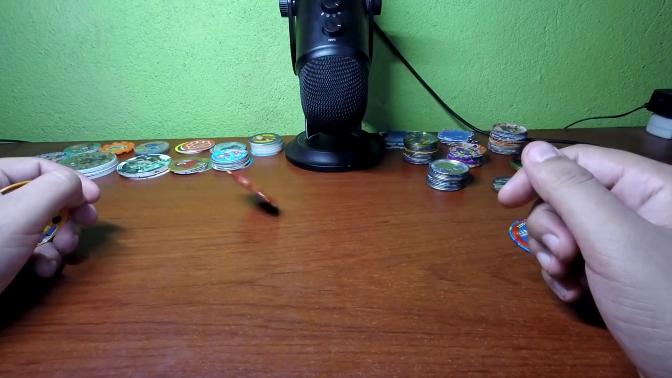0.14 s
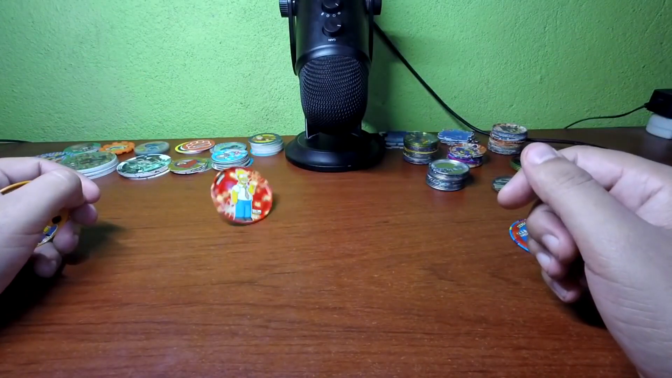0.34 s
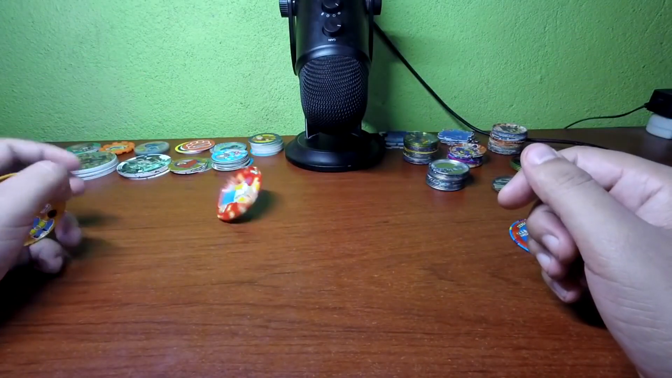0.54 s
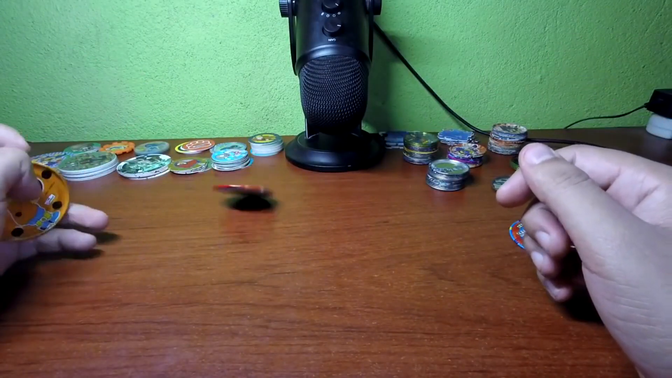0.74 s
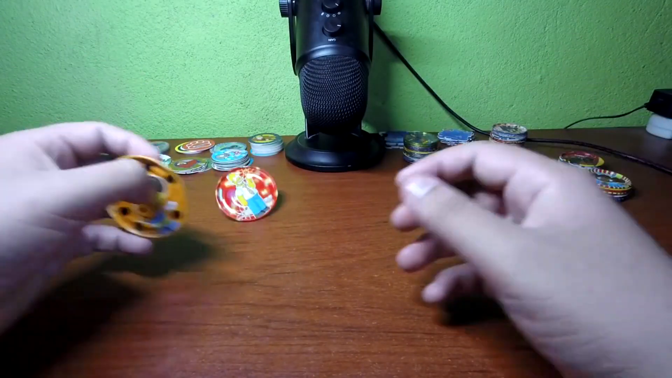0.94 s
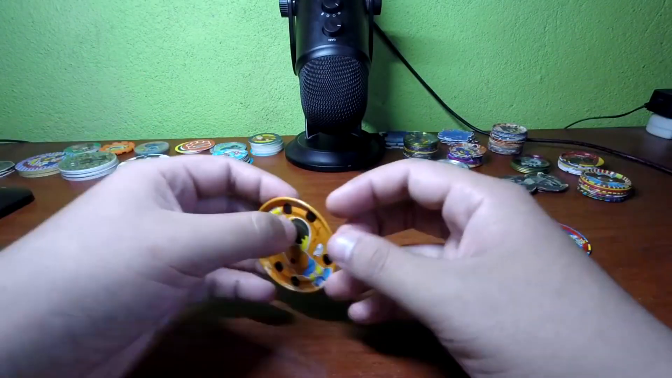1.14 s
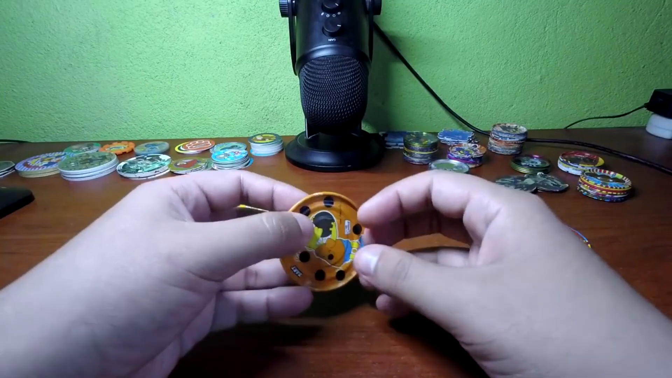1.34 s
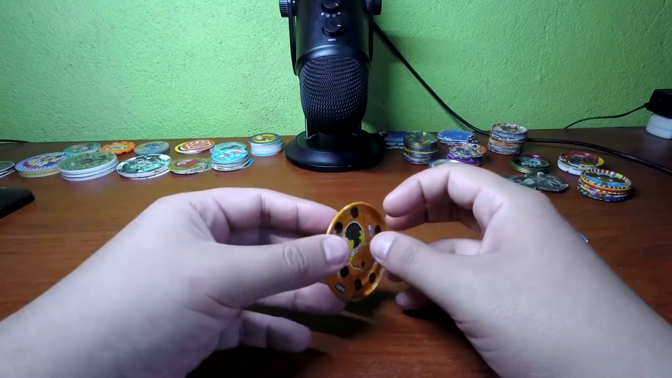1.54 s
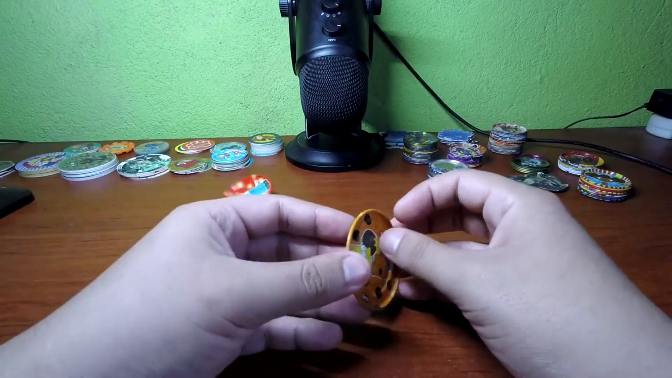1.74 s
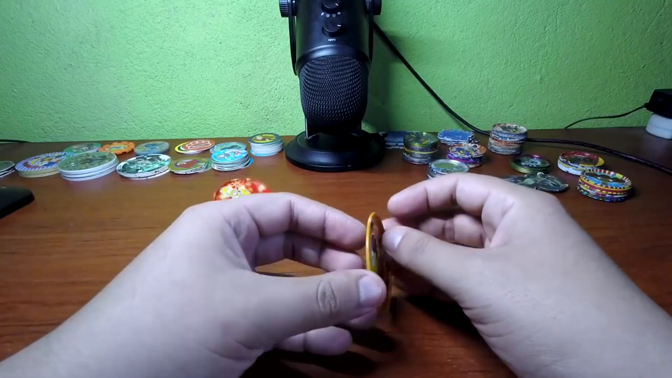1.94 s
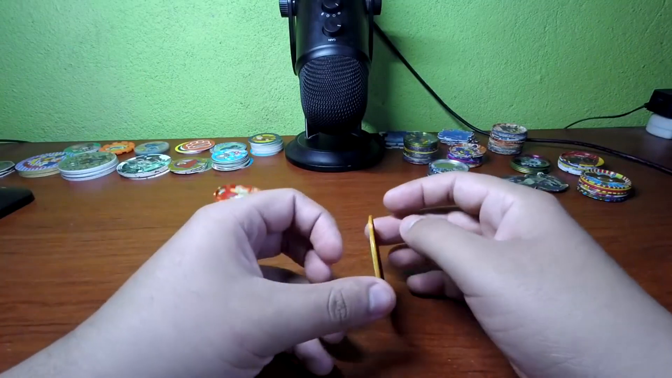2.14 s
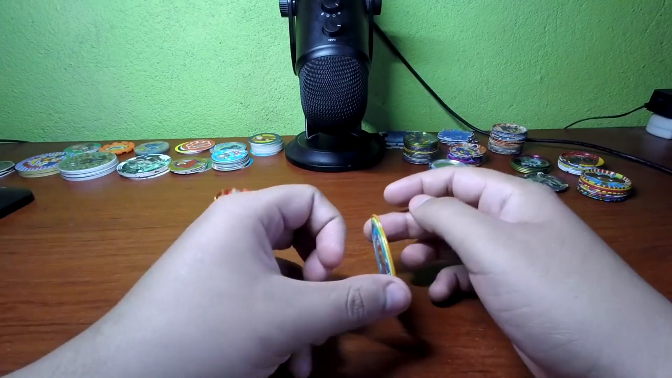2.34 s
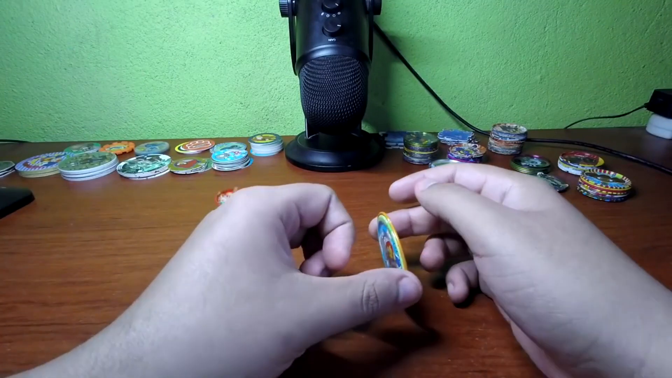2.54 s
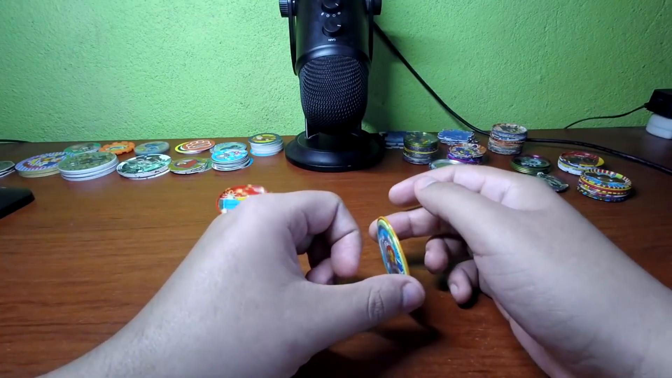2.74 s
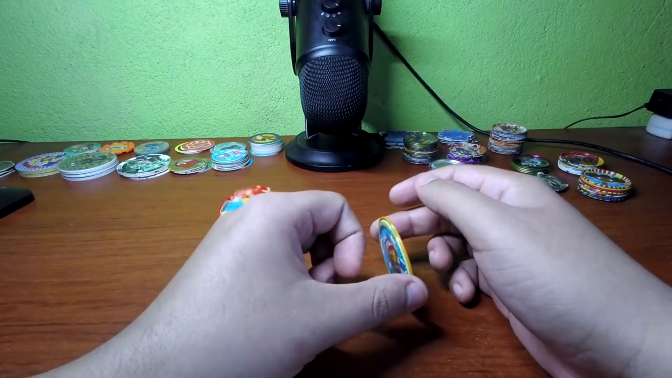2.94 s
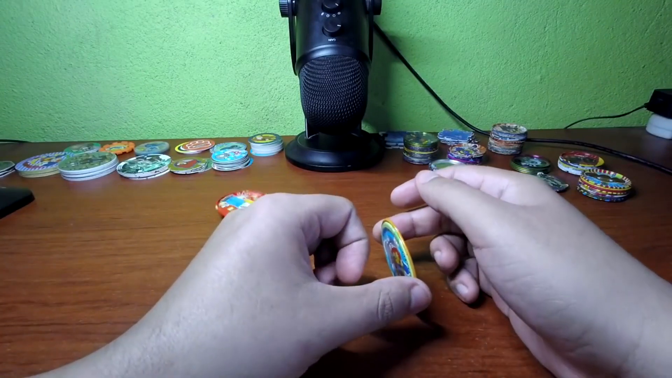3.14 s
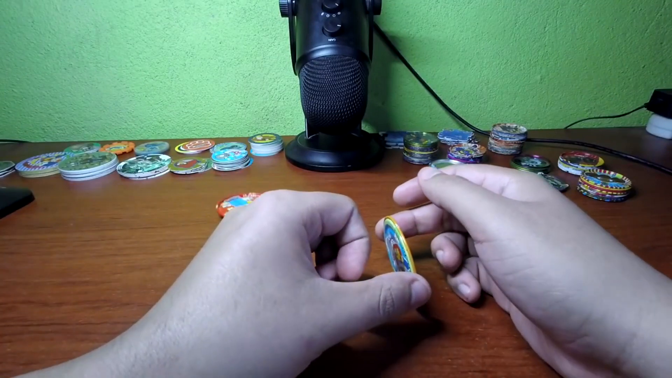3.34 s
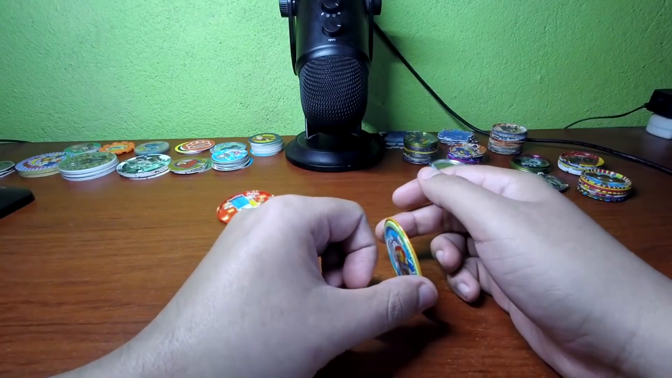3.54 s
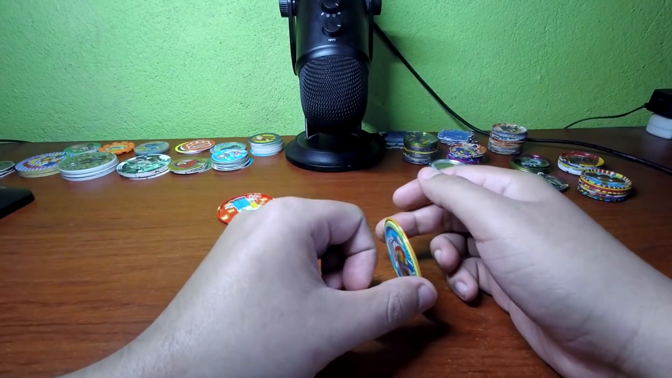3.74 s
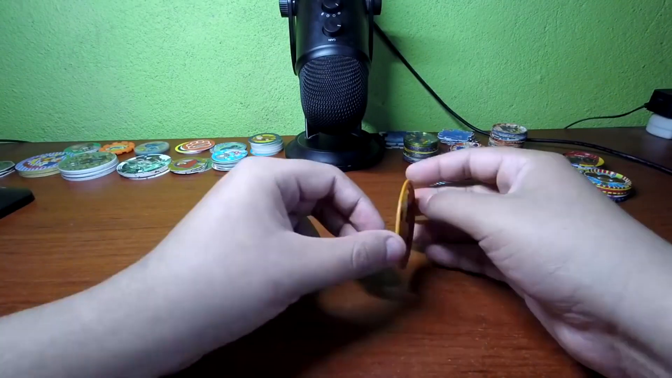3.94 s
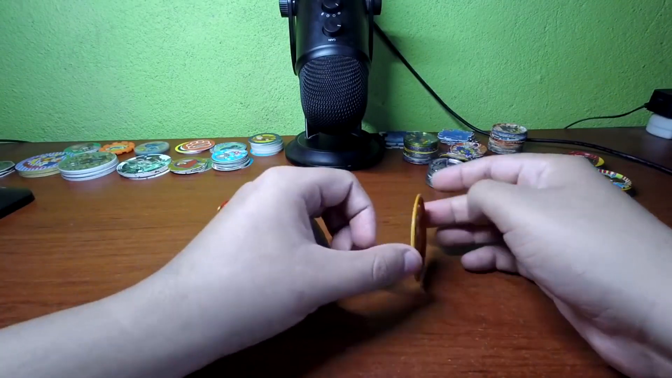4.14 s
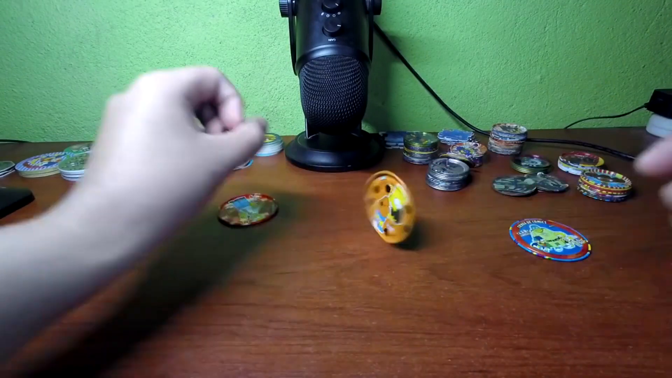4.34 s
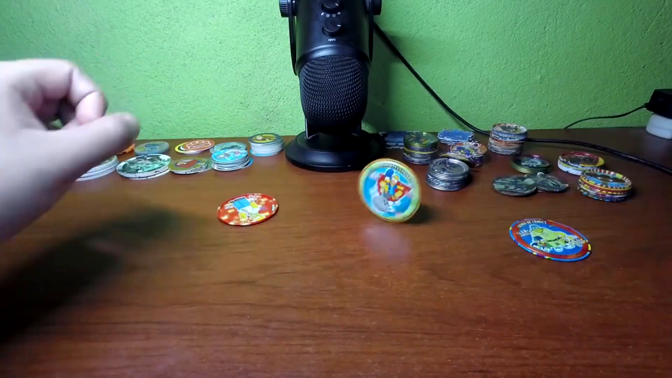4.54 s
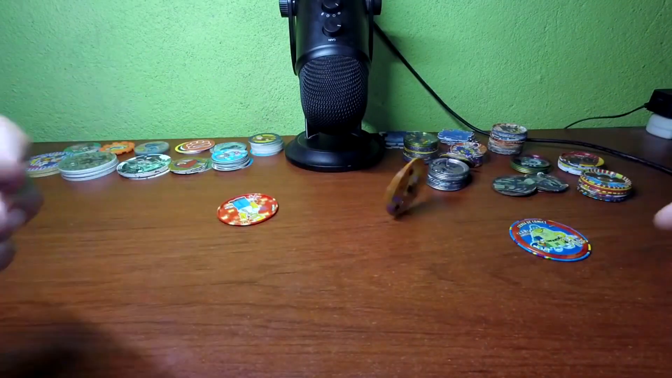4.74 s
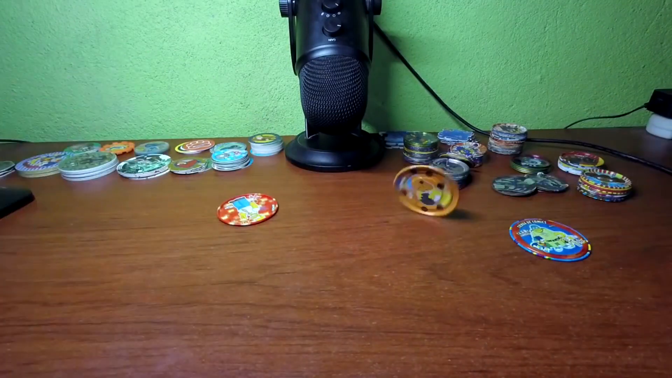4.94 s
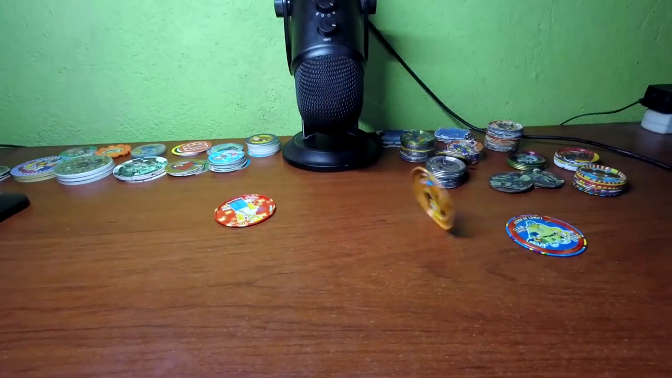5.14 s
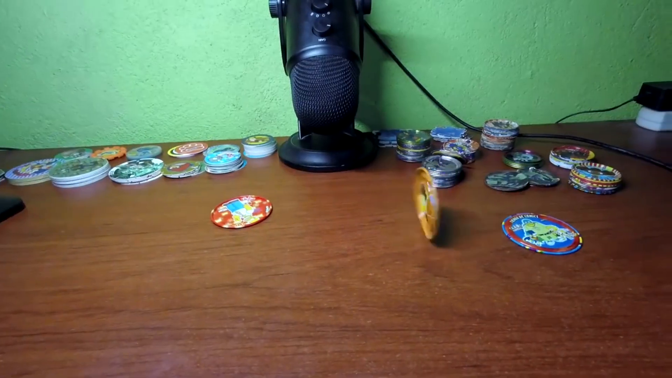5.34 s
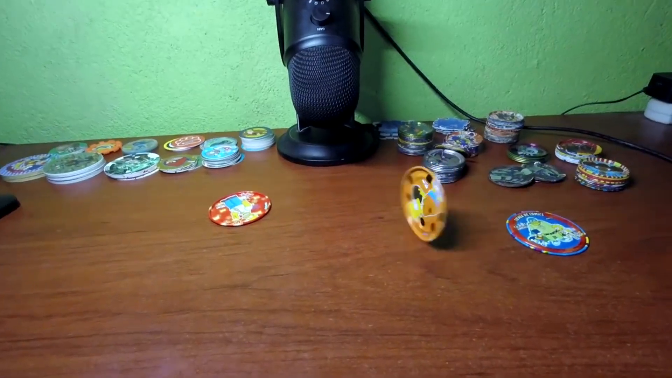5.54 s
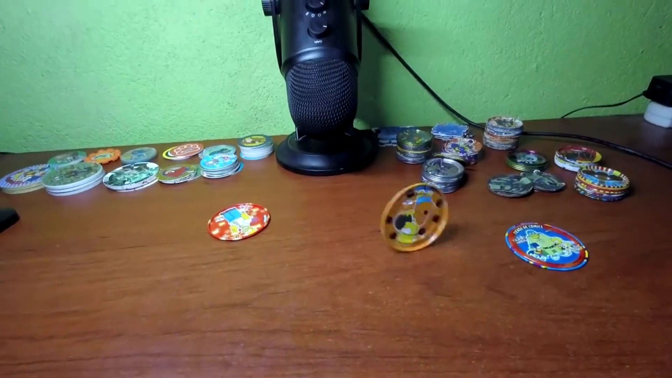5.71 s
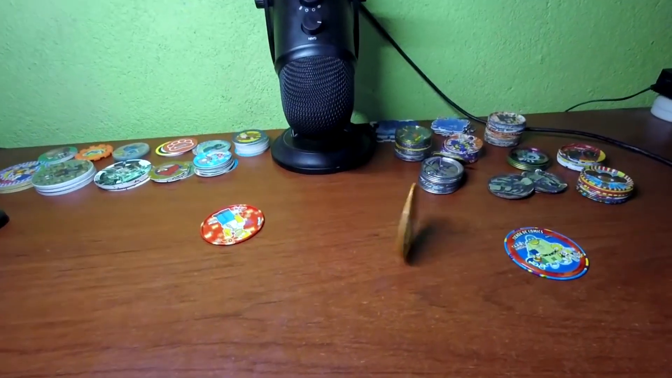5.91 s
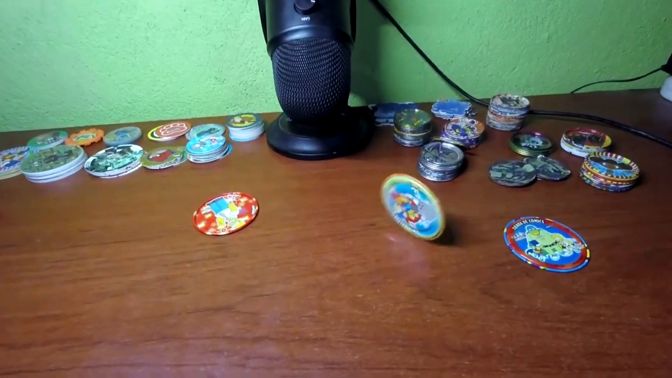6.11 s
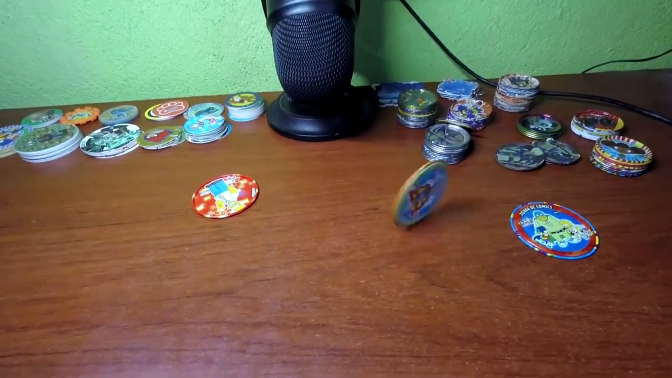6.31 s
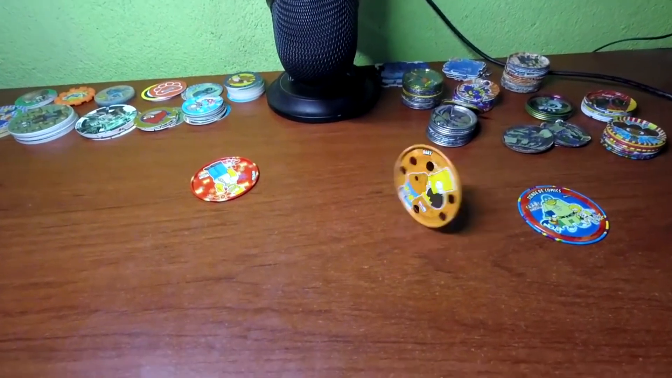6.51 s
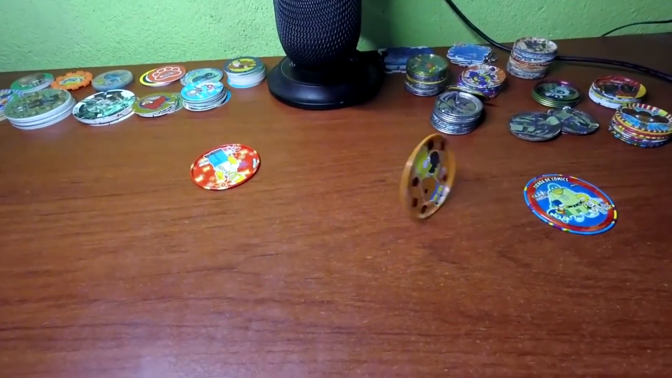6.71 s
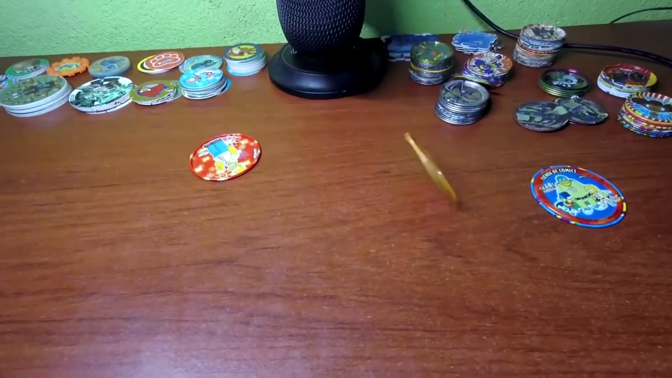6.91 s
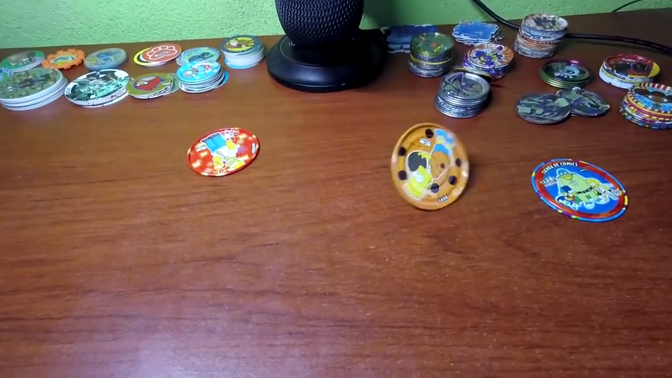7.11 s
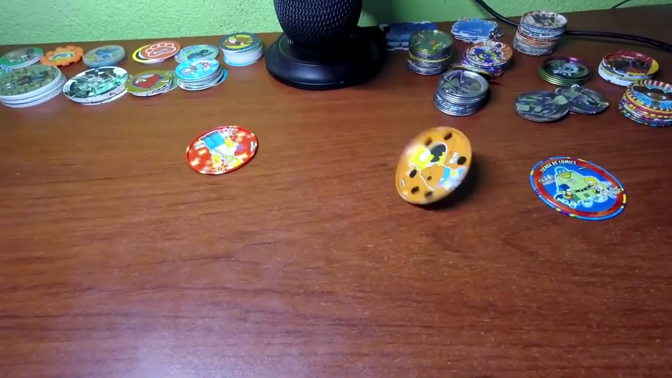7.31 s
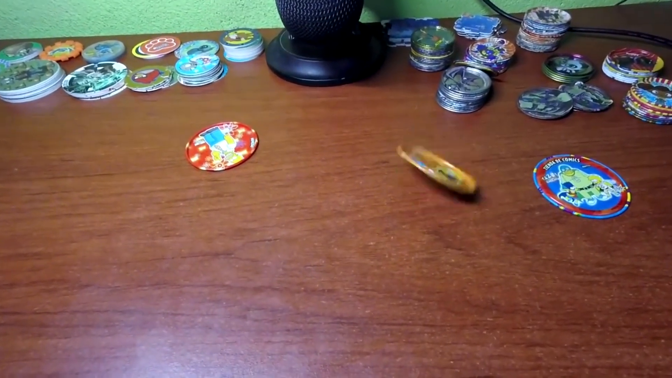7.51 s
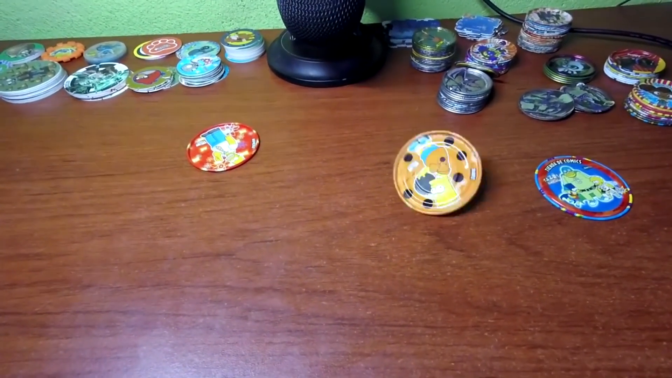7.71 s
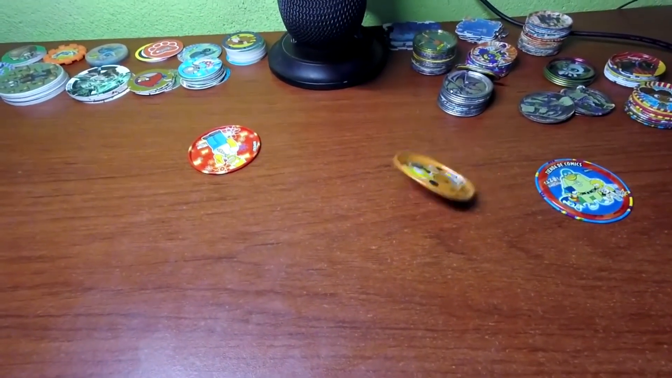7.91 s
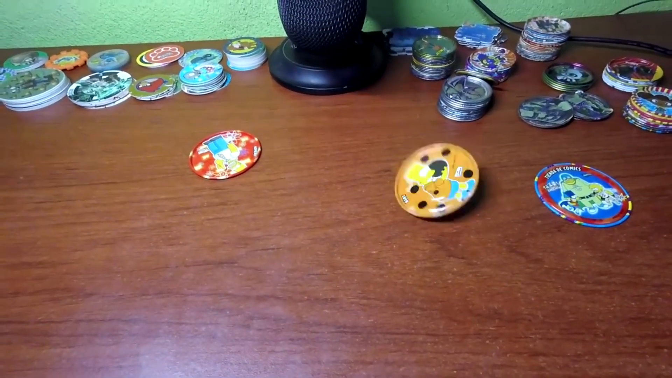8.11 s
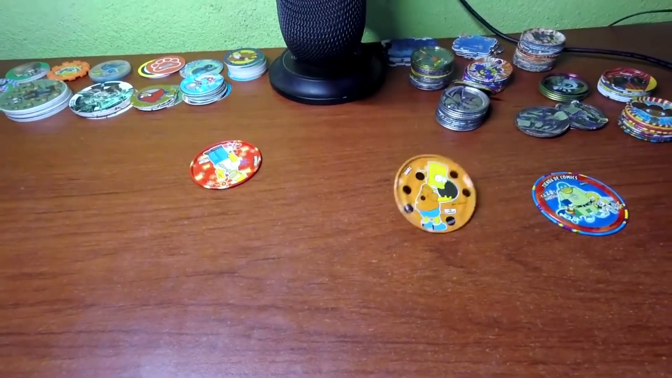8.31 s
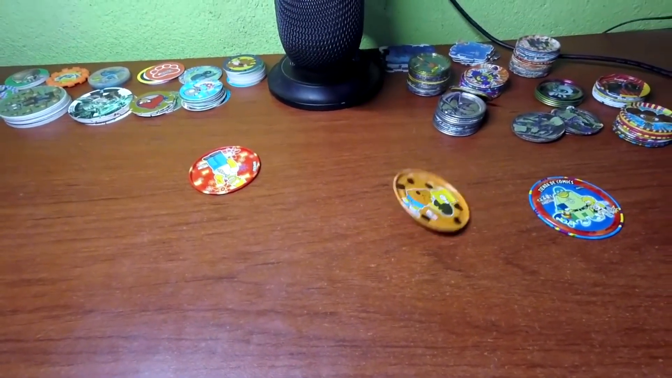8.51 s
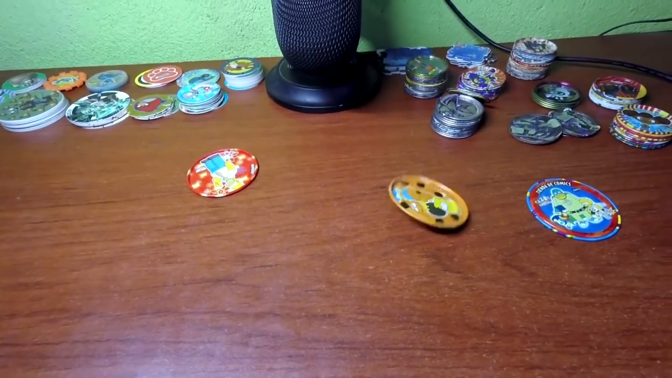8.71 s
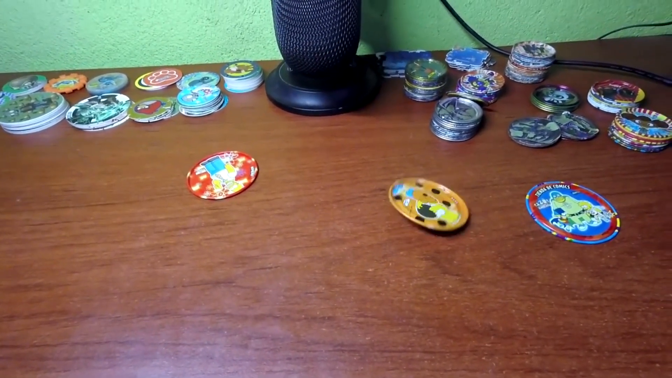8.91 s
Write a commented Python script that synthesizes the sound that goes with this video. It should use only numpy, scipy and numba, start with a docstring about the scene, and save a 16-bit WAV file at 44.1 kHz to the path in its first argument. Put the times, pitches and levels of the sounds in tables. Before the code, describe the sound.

A close stereo microphone in a quiet room, with faint room noise and a low, soft shaking of the table throughout. From the start a thin metal disc rolls on its rim on wood: a dense, grainy, bright metallic rattle, pulsing about five times a second, quickening and growing brighter, strongest around 2.4, then racing at over twenty wobbles a second before being damped flat at about 3.8. A short near-silence follows. At 4.2 a second disc lands with a clear, ringing clack and spins on edge, fading to faint ringing skids and light taps, with dull thumps at 4.7 and 5.0 and a tiny cloth rustle just after. From 5.6 to 6.4 it is almost silent. Around 6.8 it leans over and the bright rattle returns, with sharper knocks at 7.8, 8.6 and 8.7, wobbling from six to eleven times a second and still running when the sound ends at about 9.

```python
"""Over quiet room noise and a low shaking, a thin metal disc rolls on its rim on a wooden table:
dense contact ticks excite its modes and swell as it wobbles ever faster, until it lies flat and is damped.
A second disc then lands and spins on edge, ringing longer, with skids, thumps and brief cloth rustles;
at last it leans over and wobbles ever faster in its turn. Modes are driven resonators; wood, scrape,
cloth, thumps and room are filtered noise or ticks."""
import sys
import numpy as np
from scipy import signal
from scipy.fft import rfft, irfft
from scipy.io import wavfile
from scipy.ndimage import uniform_filter1d
from numba import njit

SR = 44100
rng = np.random.default_rng(int(sys.argv[2]) if len(sys.argv) > 2 else 0)


def wav_out(sig):
    """Save sig, one row per channel (or a flat mono array), as 16-bit PCM at SR to the path in sys.argv[1]."""
    wavfile.write(sys.argv[1], SR, np.round(np.clip(np.atleast_2d(sig).T, -1, 1) * 32767).astype(np.int16))


N = 399546
HOP = 16  # samples per step of the slow controls

# Room noise spectrum: f/Hz, relative density/dB
ROOM_SPECTRUM = [(110, -5.5), (150, -11), (210, -6), (250, 4), (290, -10.5), (400, -10), (560, -20),
                 (650, -8.5), (800, -19), (1900, -31), (4000, -39.5), (15600, -47)]
ROOM_DB = -56.5  # mean level of a slow random sway
# Spectrum of the low shaking: f/Hz, relative density/dB
SHAKE_SPECTRUM = [(15, -14), (30, -7), (41, 3), (52, -1), (63, 1), (80, -6), (105, -12.5), (135, -27),
                  (250, -56)]
# Steady low shaking of the stand: t/s, level/dB
SHAKING_LEVEL = [(0.0, -44), (0.2, -48), (1.3, -46.5), (1.85, -44), (2.25, -49.5), (3.5, -52.5), (3.8, -47),
                 (5.5, -49), (9.06, -49.5)]
# Thumps through the table: t/s, length/s, left level/dB, right level/dB
THUMPS = [(0.72, .2, -48, -49), (2.72, 0.1, -45, -48), (4.17, 0.23, -43, -42), (4.74, 0.18, -39, -43),
          (5.02, 0.21, -31, -35.5)]
SWELL_RISE = .3  # share of a swell's length spent rising

# Rolling rim of each disc: t/s, low ring level/dB, high ring level/dB
FIRST_ROLL = [(0.0, -41.5, -38), (0.48, -40.5, -35), (0.54, -38.5, -29.5), (1.08, -38.5, -29.5),
              (1.15, -41, -30.5), (1.55, -39, -28), (2.1, -41.5, -26), (2.38, -38.5, -21),
              (2.45, -39.5, -28), (3.3, -40, -28.5), (3.6, -42.5, -32.5), (3.73, -43, -39.5),
              (3.81, -80, -82)]
SECOND_ROLL = [(4.192, -36, -53), (4.22, -32, -44), (4.3, -32, -48), (4.36, -43.5, -57.5),
               (4.48, -46.5, -66), (4.64, -47.5, -64), (4.69, -72, -82.5), (5.19, -55.5, -73.5),
               (5.6, -73.5, -96), (6.3, -77.5, -99), (6.45, -65.5, -77), (6.66, -52.5, -75.5),
               (6.84, -43.5, -49.5), (6.91, -40.5, -36), (7.3, -40, -32), (7.75, -41.5, -31),
               (7.85, -39.5, -27.5), (8.8, -43, -27), (8.89, -42.5, -35.5), (9.06, -39, -28)]
# Wobble, faster as the disc sinks: t/s, rate/(turns per s)
FIRST_WOBBLE_RATE = [(0, 5.407), (.8, 7.042), (1.6, 8.165), (2.4, 9.902), (3.1, 12.719), (3.45, 17.344),
                     (3.7, 22.271)]
SECOND_WOBBLE_RATE = [(6.85, 6.41), (7.4, 6.719), (8, 8.178), (8.5, 9.01), (9.05, 10.833)]
FIRST_TURN, SECOND_TURN = .184, 0.51  # part of a turn left to the first swell
# Mode pitches: f/Hz
FIRST_PITCHES = [1575, 2444, 2869, 3580, 3706, 3908, 5238, 6110, 7142, 7252, 7481, 8021, 9204, 9330, 9826,
                 11469, 11596, 12065, 13340, 13722, 14806, 14911, 15003]
SECOND_PITCHES = [1735, 2450, 2642, 3425, 3860, 4325, 5457, 7216, 7619, 7725, 7855, 8267, 9440, 10911,
                  11153, 11854, 11962, 12245, 14249, 15095]
# One row per pitch: width/Hz before damping (at least 5), relative level/dB,
# left minus right level/dB, phase lag of the right channel/rad
FIRST_MODE_ROWS = [(57, -9.5, 2.5, 0.83), (58.4, -14, -5, 0.07), (90, -27, -1, -1.5), (71, -13, -10.5, 0),
                   (41, -2, 0.5, 4.5), (33, -10, 6, 0), (25, 0, 14, 1.44), (24, -10, 11.5, -1.5),
                   (25.7, -2.5, 3.5, 3.1), (19.5, 2, 2, 2.35), (19, 4, 6.5, 1.4), (90, -4.5, 9.5, 2.5),
                   (23, -1.5, 1.6, 3.5), (35, -2, 1.5, 3.5), (33.7, -0.2, 5.5, 3.5), (26.14, -10, 8.5, 2),
                   (30, -14, 4.5, 0.1), (63, -5.5, 8, -1.5), (19, -5.5, 11.5, -2.2), (41, -22.5, 8.5, 4.5),
                   (26.22, -7.5, 10.5, -1.5), (34, -4, 10, -1), (90, -11, 10, -2.2)]
SECOND_MODE_ROWS = [(53.5, -7, -5, 1.33), (96, -28, -18, 0.8), (39, -10.5, -7.5, 0.85),
                    (75.6, -17.5, -7, 0.96), (32.5, 1, 1.1, 3), (47, -17, -9, -2.5), (30, -0.5, 0, -1.2),
                    (26, -3, -8.5, -1.5), (22, -7, -6, 2.5), (22.222, -3, -9, 3.5), (12.4, -2.5, -8.5, 4),
                    (31.8, -4, -2, 1.5), (23, -8.5, 8.5, 1), (17, -7.5, -3, 3), (25.926, -4.5, -4, 4),
                    (18, -16, 8, 9), (28, -23, -3, 9.5), (23, -19, 11, -2), (35.8, -4, -7, 1.5),
                    (38, -17, 2, -1.5)]
# Landings of the rim on the wood: t/s, low ring level/dB, high ring level/dB, before the pulse shape
LANDINGS = [(4.1922, -17.5, -38), (4.2185, -26, -32), (4.2405, -26, -48), (4.2584, -32, -38),
            (4.577, -31, -45), (4.7214, -43, -76), (4.763, -36, -72), (4.8954, -46, -80),
            (4.9462, -38, -66), (5.1347, -38, -64), (5.469, -53, -80), (5.7004, -50, -81),
            (6.4044, -47, -43.5), (6.5154, -47, -71), (7.813, -31, -18), (8.614, -43, -18.5),
            (8.705, -63, -18.5)]
# Skids or heavier pressure of the rim: t/s, length/s, low ring level/dB, high ring level/dB
SKID_SWELLS = [(0.0, 0.084, -37, -43), (0.147, 0.11, -43.5, -30.5), (0.331, 0.034, -64, -45),
               (0.706, .086, -65, -34), (0.986, 0.033, -65, -30), (1.041, 0.066, -52, -30.5),
               (1.253, .04, -38.5, -33), (1.327, 0.048, -60, -34.5), (1.569, 0.1, -52, -26),
               (1.907, 0.073, -40, -28), (2.038, 0.1, -51, -25), (2.463, 0.06, -50, -21.5),
               (2.556, 0.063, -39, -23), (2.914, 0.066, -47, -28), (2.999, 0.022, -54, -26),
               (3.07, 0.074, -45, -32), (3.343, 0.061, -47, -30), (3.41, .045, -56, -33),
               (3.468, .03, -62, -24), (4.52, 0.13, -41.5, -62), (4.71, 0.066, -49, -85),
               (4.755, 0.087, -47.5, -98), (4.885, 0.13, -48, -84), (4.93, 0.078, -45.5, -68),
               (5.11, .11, -44, -61), (5.46, 0.078, -62, -90), (5.69, .11, -58.5, -90),
               (6.02, 0.11, -62, -94.5), (6.35, 0.16, -46.5, -69.5), (6.51, 0.038, -62, -82),
               (7.074, .053, -43.5, -57), (7.221, 0.088, -44.5, -36), (7.37, 0.18, -55, -36.5),
               (7.805, .07, -48, -34), (7.914, 0.067, -41, -39), (8.023, 0.063, -58, -56),
               (8.139, 0.047, -50, -29), (8.49, 0.051, -44, -24), (8.604, 0.02, -51, -34),
               (8.698, 0.035, -71, -32), (8.755, 0.064, -47, -32.5), (8.984, 0.081, -58, -35)]
# Table-top response to the ticks: f/Hz, relative density/dB
WOOD_SPECTRUM = [(150, -16.5), (230, -6), (400, -10), (720, -14.5), (950, -8), (1400, -2.5), (2000, -7),
                 (3000, -6), (4400, -20), (9000, -29.5)]
# Scrape of the rim: f/Hz, relative density/dB
SCRAPE_SPECTRUM = [(2500, -30.5), (4400, -6), (6500, -5.5), (8600, 4), (10000, -11.5), (10500, -16.5),
                   (11300, -19), (12800, -10), (15500, -3.5)]
# Change of mode level when fully on edge: f/Hz, level/dB
EDGE_RING_LEVEL = [(1735, -3.5), (2450, 0.5), (2642, 5), (3425, -3), (3860, -5.5), (4325, -4), (5457, -1),
                   (8000, -2.5), (9400, 0), (15000, 6)]
# Duller wood response under a disc on edge: f/Hz, relative density/dB
EDGE_WOOD_SPECTRUM = [(150, -5.5), (300, -6), (650, -3), (1300, 1.5), (2000, -5.5), (3500, -27.5),
                      (6000, -31.5)]
WOOD_DB, EDGE_WOOD_DB, SCRAPE_DB = -5, -5.5, -11.5  # wood relative to low ring, scrape to high ring
TICKS_PER_S, TICK_SPREAD_DB = 6000, 2.2  # mean rate of each train, mean of the exponential size spread
# Swell of the rings once and twice a turn, and spread of their random drift (dB)
LOW_ONCE_DB, LOW_TWICE_DB, HIGH_ONCE_DB, HIGH_TWICE_DB, DRIFT_DB = 1.75, 2, 1.33, 0, -0.4
# Half-turn knocks: level over the rolling before the pulse shape, and scatter (dB)
KNOCK_LOW_DB, KNOCK_HIGH_DB, KNOCK_SCATTER_DB = -1, 0.5, 6
ROLL_IN_S, LAND_S = (0.0083, 0.0073), (0.00016, 0.0033)  # rise and decay time constants (s)
# On edge, below this low ring level a contact hardly rings the disc: extra dB lost per dB
FAINT_DB, FAINT_SLOPE = -48.5, 2
# Spin on edge: rate (turns per s), a moment facing the microphone (s), depth 0-1 when fully upright
SPIN_PER_S, FACING_S, FACING_DEPTH = 6.9, 4.58, 0.56
# Random drift of the drive (dB), and of aim (dB) and phase (rad) where the beam is narrowest
TRAVEL_DB, AIM_DB, PHASE_RAD = 2.0, 2.0, 0.99
TWIN_SHARE = 0.3  # power share of the twin mode in the right channel, where the beam is narrowest

# Cloth rustles: t/s, length/s, level/dB
RUSTLES = [(4.74, .2, -62), (5.045, .035, -42.5), (5.13, .08, -74), (5.24, 0.027, -52), (5.385, 0.022, -64),
           (5.405, .04, -61)]
# Cloth spectrum: f/Hz, relative density/dB
CLOTH_SPECTRUM = [(1180, -4), (2000, -7), (2570, -11), (2750, -15), (3650, -12), (8190, -12), (15600, -15)]
TOP_HZ = 15620  # upper band limit


def undb(db):
    """Logarithmic level: decibels to amplitude gain."""
    return 10 ** (np.asarray(db) / 20)


def unit(x):
    """Normalisation to an rms amplitude of 1."""
    return x / np.sqrt(np.mean(x ** 2))


def curve(table, t):
    """Linear interpolation of each column at times t; -120 outside the table's span."""
    s, *columns = np.transpose(table)
    return [np.interp(t, s, c, left=-120, right=-120) for c in columns]


def colour(x, spectrum):
    """Minimum-phase filtering: folding the cepstrum of the log gain gives a causal response."""
    hz, db = np.transpose(spectrum)
    size = 8192
    bins_hz = np.arange(size // 2 + 1) * SR / size
    log_gain = np.interp(np.log(bins_hz + 1), np.log(hz), db) * np.log(10) / 20
    cepstrum = irfft(log_gain)
    cepstrum[1:size // 2] *= 2
    cepstrum[size // 2 + 1:] = 0
    response = irfft(np.exp(rfft(cepstrum)))
    return signal.oaconvolve(x, response / np.linalg.norm(response))[:len(x)]


def high_pass(x, hz):
    """Fourth-order Butterworth attenuation of the bass."""
    return signal.sosfilt(signal.butter(4, hz, "high", fs=SR, output="sos"), x)


def walk(rate, t):
    """Random modulation: normal levels drawn rate times a second, joined linearly; spread near 1."""
    levels = rng.standard_normal(N // 400)
    return np.interp(t * rate, np.arange(len(levels)), levels) * 1.2


def wide(spectrum, side):
    """Partial stereo coherence: one shared noise plus one of opposite sign in the two channels."""
    m, s = (colour(rng.standard_normal(N), spectrum) for _ in range(2))
    return unit(np.array([m + side * s, m - side * s]))


def swells(table, t):
    """Sine-squared envelopes: every row rises and dies away over its length, and rows add."""
    out = np.zeros((len(table[0]) - 2, len(t)))
    for s, length, *dbs in table:
        near = slice(*np.searchsorted(t, [s, s + length]))
        phase = np.interp(t[near] - s, [0, SWELL_RISE * length, length], [0, np.pi / 2, np.pi])
        out[:, near] += np.outer(undb(dbs), np.sin(phase) ** 2)
    return out


def room(t):
    """Stationary room noise: a filtered spectrum, strongest near 250 Hz, swaying slowly in level."""
    return unit(high_pass(wide(ROOM_SPECTRUM, .6), 95)) * undb(ROOM_DB + 0.87 * walk(1.7, t))


def thump(t):
    """Low-frequency vibration of the stand: steady shaking with short swells for the thumps."""
    balance_db = np.array([[.8], [-.8]])
    shaking = undb(curve(SHAKING_LEVEL, t)[0] + 1.6 * walk(6.6, t) + balance_db)
    return wide(SHAKE_SPECTRUM, 0.65) * (shaking + swells(THUMPS, t))


def ticks(t):
    """Random impulsive contact: two trains of dense ticks of either sign, bunched as the grain passes."""
    hit = rng.random((2, len(t))) < TICKS_PER_S / SR
    size = undb(TICK_SPREAD_DB * rng.exponential(size=hit.shape) + 1.1 * walk(45, t))
    sign = np.sign(rng.random(hit.shape) - .5)
    return unit(hit * size * sign)


def knocks(table, t, rise_s, decay_s):
    """Transient contact force: each knock presses the rim into the grain with a rise and a decay."""
    out = np.zeros((2, len(t)))
    for s, *dbs in table:
        near = slice(*np.searchsorted(t, [s, s + .06]))
        age = t[near] - s
        out[:, near] += np.outer(undb(dbs), (1 - np.exp(-age / rise_s)) * np.exp(-age / decay_s))
    return out


def contact(roll, wobble, first_turn, t):
    """Periodic contact force: rolling modulated by the wobble, half-turn knocks, skids and landings, in dB."""
    turns = np.cumsum(np.interp(t, *np.transpose(wobble))) * HOP / SR
    turns = turns - np.interp(wobble[0][0], t, turns) - first_turn
    leaning = t >= wobble[0][0]
    once = leaning * np.cos(2 * np.pi * turns)
    twice = leaning * np.cos(4 * np.pi * turns)
    low, high = curve(roll, t)
    # each half turn the leaning rim knocks, a little ahead of the swell
    half = np.flatnonzero(leaning[1:] & (np.diff(np.floor(2 * turns + .12)) > 0))
    scatter = KNOCK_SCATTER_DB * rng.standard_normal((100, 2))[:len(half)]
    knock_low = low[half] + KNOCK_LOW_DB + scatter[:, 0]
    knock_high = high[half] + KNOCK_HIGH_DB + scatter[:, 1]
    rolled_in = np.c_[t[half], knock_low, knock_high]
    rolling = undb([low + LOW_ONCE_DB * once + LOW_TWICE_DB * twice + DRIFT_DB * walk(18, t),
                    high + HIGH_ONCE_DB * once + HIGH_TWICE_DB * twice + DRIFT_DB * walk(11, t)])
    struck = knocks(rolled_in, t, *ROLL_IN_S) + knocks(LANDINGS, t, *LAND_S)
    return 20 * np.log10(rolling + swells(SKID_SWELLS, t) + struck)


@njit
def add_mode(out, grain, hz, width, drive, facing, aim, lag, twin, hop):
    """Damped resonance: a mode and its twin of equal pitch; left hears the mode, right a mix of both."""
    a, b, turn = 0j, 0j, np.exp(2j * np.pi * hz / SR)
    for k in range(len(drive)):
        loss = np.pi * width[k] / SR
        pole = turn * (1 - loss)
        push = 2 * np.sqrt(loss) * drive[k]
        late = np.exp(-1j * lag[k]) / aim[k]
        for i in range(k * hop, (k + 1) * hop):
            a = a * pole + push * grain[0, i]
            b = b * pole + push * grain[1, i]
            out[0, i] += a.imag * aim[k] * facing[k]
            out[1, i] += ((a * np.sqrt(1 - twin) + b * np.sqrt(twin)) * late).imag * facing[k]


def disc(roll, wobble, first_turn, pitches, modes, pan_db, flat_s):
    """Modal excitation and directivity: ticks ring every mode, each aimed differently at the two channels."""
    start, stop = int(roll[0][0] * SR), min(N, int((roll[-1][0] + .2) * SR))
    t = np.arange(start, stop - HOP, HOP) / SR
    low_db, high_db = contact(roll, wobble, first_turn, t)
    grain = ticks(np.arange(start, start + HOP * len(t)) / SR)
    ring = np.zeros(grain.shape)
    hz, (width, db) = np.array(pitches), np.transpose(modes)[:2]
    power_db = db + 10 * np.log10(width)
    bright = np.log(hz / 1750) / np.log(7500 / 1750)  # 0 for the low ring, 1 for the high
    low_sum, high_sum = (10 * np.log10(np.sum(undb(2 * power_db[m]))) for m in (hz < 3000, hz > 4500))
    # an upright disc touches the wood lightly and rings longer; a flat one is smothered
    upright = np.clip(uniform_filter1d(low_db - high_db, size=250) / 22, 0, 1)
    damping = 1 - 0.96 * upright + 5 * np.clip((t - flat_s) / 0.046, 0, 1)
    faint_db = FAINT_SLOPE * np.minimum(low_db - FAINT_DB, 0) * upright
    edge_db = np.interp(hz, *np.transpose(EDGE_RING_LEVEL))
    for f, (w, _, pan, lag), p_db, b, e_db in zip(hz, modes, power_db, bright, edge_db):
        force_db = (1 - b) * (low_db - low_sum) + b * (high_db - high_sum)
        # the contact point travels round the rim, past the nodes of each mode
        drive = undb(p_db + e_db * upright + faint_db + force_db + TRAVEL_DB * walk(14, t))
        beam = min(max(b + .4, 0), 1)  # higher modes radiate in narrower lobes
        aim = undb(pan / 2 + AIM_DB * beam * walk(12, t))
        lobes = 2 if f < 2000 else 4  # swells per turn of the spin
        facing = 1 + FACING_DEPTH * upright * np.cos(2 * np.pi * lobes * SPIN_PER_S * (t - FACING_S))
        phase = lag + PHASE_RAD * beam * walk(16, t)
        add_mode(ring, grain, 1. * f, max(w, 5) * damping, drive, facing, aim, phase,
                 min(TWIN_SHARE * beam, 1.), HOP)
    ring = high_pass(ring, 900)  # a small disc radiates no bass
    # wood and scrape sound with the ticks but do not ring
    wood = np.repeat(undb(low_db + WOOD_DB) * (1 - upright), HOP)
    edge = np.repeat(undb(low_db + EDGE_WOOD_DB) * upright, HOP)
    scrape = np.repeat(undb(high_db + SCRAPE_DB), HOP)
    mid, side = (colour(g * wood, WOOD_SPECTRUM) + colour(g * scrape, SCRAPE_SPECTRUM)
                 + colour(g * edge, EDGE_WOOD_SPECTRUM) for g in grain)
    pan_gain = undb([[pan_db / 2], [-pan_db / 2]])
    out = np.zeros((2, N))
    out[:, start:start + len(mid)] = ring + pan_gain * [mid + 0.69 * side, mid - 0.22 * side]
    return out


def rustle(t):
    """Friction noise: cloth brushing cloth gives treble noise of grainy level."""
    return wide(CLOTH_SPECTRUM, 0.8) * swells(RUSTLES, t) * undb(2.0 * walk(60, t))


def scene():
    """Superposition of room, shaking, both discs and cloth."""
    t = np.arange(N) / SR
    first = disc(FIRST_ROLL, FIRST_WOBBLE_RATE, FIRST_TURN, FIRST_PITCHES, FIRST_MODE_ROWS,
                 pan_db=4.0, flat_s=3.66)
    # the second disc does not come to lie flat
    second = disc(SECOND_ROLL, SECOND_WOBBLE_RATE, SECOND_TURN, SECOND_PITCHES, SECOND_MODE_ROWS,
                  pan_db=-0.16, flat_s=N / SR)
    return room(t) + thump(t) + first + second + rustle(t)


def record(dry):
    """Band limitation: a steep elliptic low-pass cuts the top."""
    return signal.sosfilt(signal.ellip(12, .2, 90, TOP_HZ, fs=SR, output="sos"), dry)


dry = scene()
out = record(dry)
wav_out(out)
```